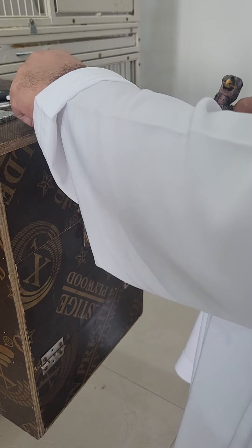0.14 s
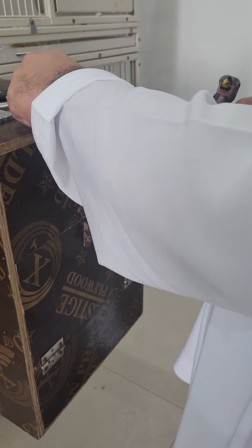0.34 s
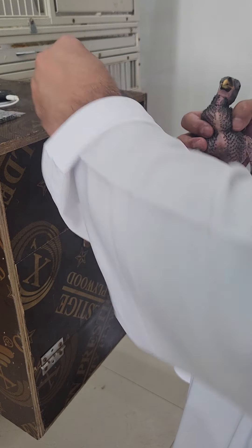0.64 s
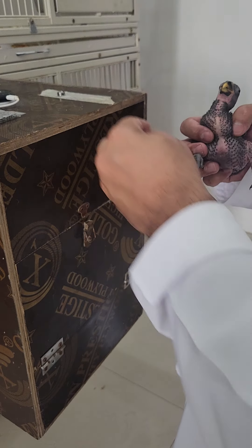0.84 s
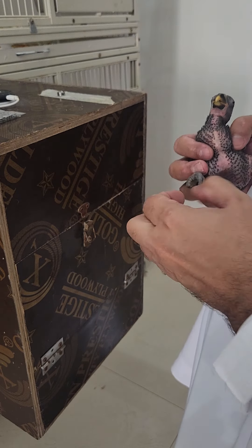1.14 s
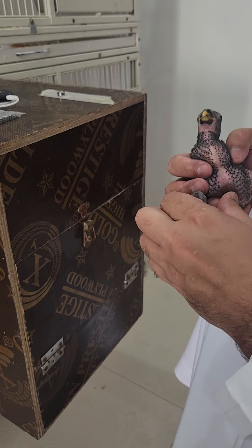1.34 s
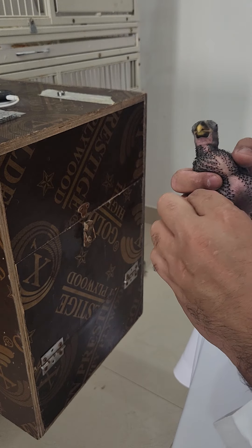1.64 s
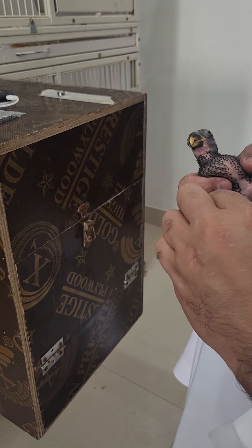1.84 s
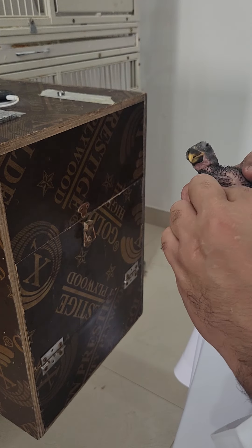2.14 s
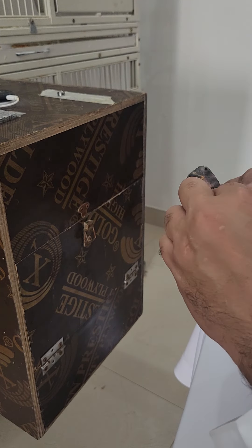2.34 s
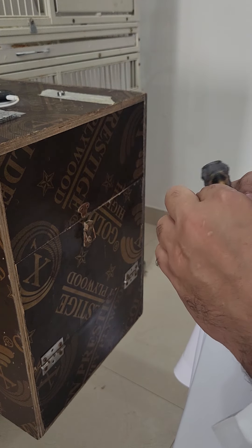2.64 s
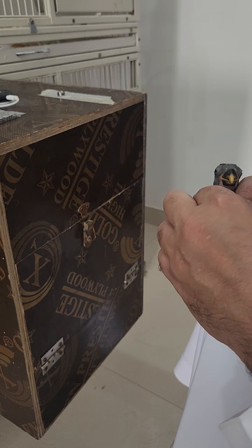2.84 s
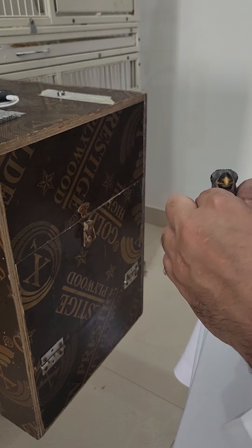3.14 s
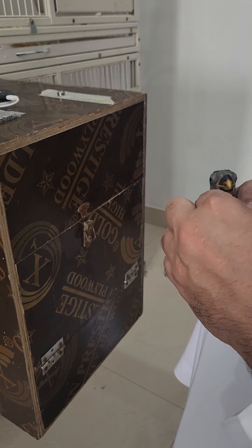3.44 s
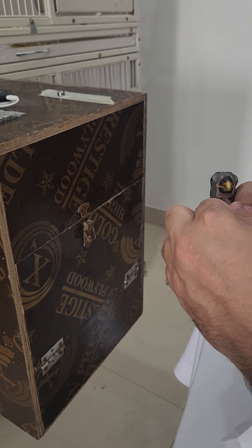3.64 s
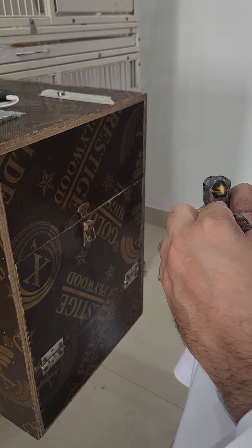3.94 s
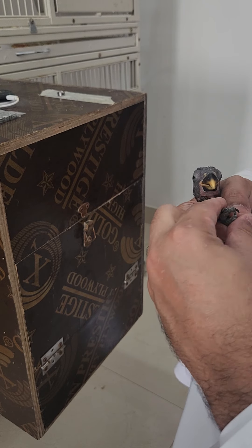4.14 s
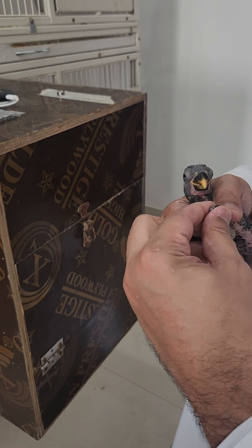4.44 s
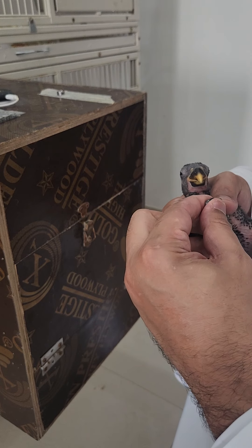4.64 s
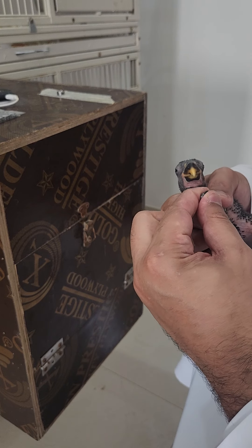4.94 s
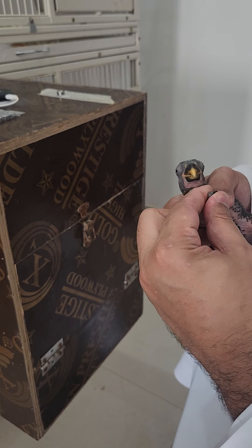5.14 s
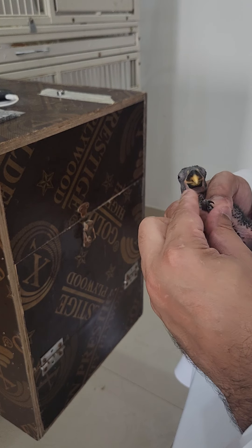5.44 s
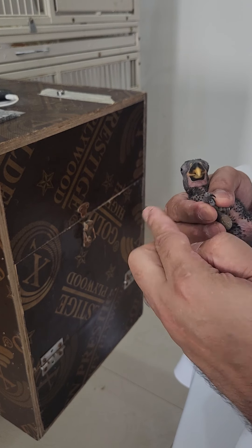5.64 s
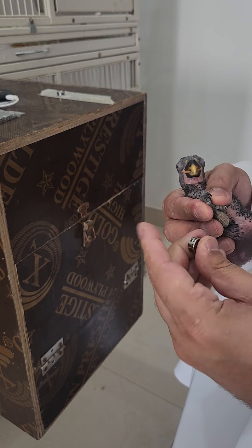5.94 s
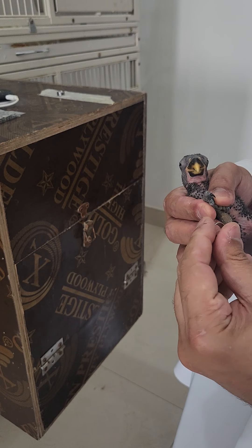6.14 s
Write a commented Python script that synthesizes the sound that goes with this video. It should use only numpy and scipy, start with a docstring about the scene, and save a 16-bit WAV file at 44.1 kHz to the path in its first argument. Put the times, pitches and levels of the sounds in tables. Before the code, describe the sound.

Ventilation air and a low motor hum fill a bare, echoing room, with the microphone a little way from a baby parrot. The bird opens with a few high, raspy screeches, each about half a second long. After a lull with soft handling rustle, a sharp squeak starts a rapid run of rough, whistling squeals that crack between pitches and collapse into rasps, ending in thin whines.

```python
"""In a bare tiled room a parrot chick, held in the hands, gives rasping screeches, then a run of squeals.
Source and filter: its syrinx either rattles chaotically or locks into whistles that jump between three
registers, and the resonances of throat and beak colour both. The hard walls reverberate after every
call, over ventilation noise, a low motor hum and the soft rustle of handling."""
import sys
import numpy as np
from scipy import signal
from scipy.fft import rfft, irfft, next_fast_len
from scipy.io import wavfile
from scipy.ndimage import uniform_filter1d, minimum_filter1d, map_coordinates

SR = 44100
rng = np.random.default_rng(int(sys.argv[2]) if len(sys.argv) > 2 else 0)


def transcribe(u):
    """Save the signal u as a 16-bit wav file named by the first command-line argument.

    u: samples, shape (n,) or (channels, n), limited to [-1, 1]; the rate is SR.
    q: integer samples, one column per channel.
    """
    v = np.clip(np.atleast_2d(u).T, -1, 1)
    q = np.round(v * 32767).astype(np.int16)
    wavfile.write(sys.argv[1], SR, q)


N = 277830
LEAD = SR * 3 // 10  # samples before t = 0, so the room is already ringing
TIME = np.arange(-LEAD, N) / SR


def undb(db):
    """Amplitude ratio of a level in decibels."""
    return 10 ** (np.asarray(db) / 20)


def unit(x):
    """Normalisation to rms 1."""
    return x / np.sqrt(np.mean(x ** 2))


def at_hz(points, hz):
    """Interpolation of (f/Hz, value) rows on a log-frequency axis."""
    f, value = np.transpose(points)
    return np.interp(np.log(np.maximum(hz, 1)), np.log(f), value)


def wander(t, rate):
    """Smooth random modulation of spread near 1, changing about rate times a second."""
    place = (t - t[0]) * rate
    return map_coordinates(rng.standard_normal(16384), [place], order=2, mode="wrap")


def course(t, start, length):
    """Zero-mean contours of a call: a ramp from -1/2 to 1/2 and an arch."""
    progress = np.clip((t - start) / length, 0, 1)
    return progress - 1 / 2, np.sin(np.pi * progress) - 2 / np.pi


def band(drive, hz, width, order=4):
    """Resonance by heterodyning: low-passed complex noise is shifted to a centre that may move."""
    envelope = signal.sosfilt(signal.butter(order, width / 2, fs=SR, output="sos"), drive)
    return np.real(envelope * np.exp(2j * np.pi * np.cumsum(hz + np.zeros(len(drive))) / SR))


def rasp(start, attack, hold, release, db, lower_hz, upper_hz, glide, upper_db, lift_db, trend_db,
         fifth_db, octave_db, hiss_db, opening_s=.025, lower_climb=0.0396, dulling=0.15):
    """Source and filter: chaotic air bursts from the syrinx ring formants that follow the beak."""
    # fixed resonances of throat and beak: f/Hz, bandwidth/Hz, relative level/dB
    throat = [(2080, 520, -24), (2700, 550, -21), (3380, 600, -18), (7400, 900, -16), (8250, 800, -19),
              (11500, 1300, -28), (12000, 7000, -31), (15300, 1400, -31)]
    corners = start + np.cumsum([0, attack, hold, release])
    sounding = (TIME >= corners[0]) & (TIME <= corners[-1])
    t = TIME[sounding]
    effort_db = np.interp(t, corners, [-10.5, 0, -3.5, -26.5])
    progress, gape = course(t, start, attack + hold + release / 2)
    shut = np.exp(-(t - start) / opening_s)  # the lower formant lies flat until the beak parts
    lower_hz = lower_hz * (1 + (glide + lower_climb) * progress + .06 * gape - .12 * shut)
    upper_hz = upper_hz * (1 + glide * progress + 0.01892 * gape)
    upper_db = upper_db + lift_db * gape + trend_db * progress
    bursts = undb(2.5 * wander(t, rate=520) + 2.25 * wander(t, rate=110))
    tremble = 1 + 0.01026 * wander(t, rate=140)

    def ring(modes, order):
        """Forced resonance: pulsed turbulence drives each mode; a weaker push is duller."""
        jets = rng.standard_normal((len(modes), 2, 2 * SR))[..., :len(t)] * bursts
        ringing = 0
        for (real, imag), (hz, width, gain_db) in zip(jets, modes):
            tilt_db = dulling * effort_db * np.maximum(np.log2(hz / lower_hz), 0)
            ringing += undb(gain_db + tilt_db) * band(real + 1j * imag, hz * tremble, width, order)
        return ringing

    lower_db = 10 * np.log10(2 / (1 + undb(upper_db) ** 2))  # the two formants share the power
    # same columns as throat
    formants = [(lower_hz, 417, lower_db), (upper_hz, 383, lower_db + upper_db)]
    overtones = [(1.5 * upper_hz, 550, fifth_db), (2 * upper_hz, 550, octave_db)]
    hiss = [(5700, 4400, hiss_db)]
    voice = ring(formants + overtones, order=2) + ring(throat + hiss, order=4)
    out = np.zeros(len(TIME))
    out[sounding] = unit(voice) * undb(db + effort_db)
    return out


def screeches():
    """Chaotic oscillation of the syrinx: long pushes screech, short ones grunt."""
    # t/s, attack/s, hold/s, release/s, level/dB, lower formant f/Hz, upper formant f/Hz, glide/fraction,
    # upper minus lower/dB, its lift by the open beak/dB, its trend from start to end/dB,
    # overtones a fifth and an octave above the upper/dB, hiss/dB
    rasps = [ (-.28, 0.17, 0.097, .08, -16.5, 3930, 5090, 0.013, 17, 9, -20, -35, -18, -19),
             (.52, 0.037, .36, 0.094, -16, 3715, 5255, 0.039, 3.5, 0, -9, -10.5, -17.5, -21),
             (1.387, .036, .427, 0.15, -16, 3737, 5252, -0.046, 1, 8, 3, -7, -23, -17),
             (2.072, .03, 0.23, 0.0629, -14, 3640, 5163, -.09, 11.5, 37, 15, -12.5, -22.5, -19.5),
             (3.89, 0.0091, 0.014, 0.076, -22.5, 3200, 5050, 0.037, 5, 3, -2, -27, -32, -13),
             (4.321, 0.0313, 0.51, 0.114, -25.5, 3686, 5276, -.06, -2.5, 18, -2, -10.5, -18, -11.5),
             (4.992, .055, 0.013, .15, -25, 3590, 5140, .005, 1, 7, -7, -20, -27, -8.5),
             (5.617, 0.024, 0.014, 0.21, -25.5, 3460, 5130, -0.00038, 0, 9, 9, -6, -31, -11.5)]
    return sum(rasp(*row) for row in rasps)


def ventilation(air_db=-38, wide_hz=650, split_hz=240, bass_db=0.9, left_db=1):
    """Broadband air noise, coherent between the channels in the bass, plus a wavering motor hum."""
    # spectral shape of the air noise: f/Hz, relative density/dB
    air_spectrum = [(20, -29), (45, -12), (75, -15), (120, -12.5), (200, -9), (400, -12.5), (600, -16),
                    (800, -13), (1100, -23.5), (1600, -22), (2500, -32), (5000, -39), (8000, -49.5),
                    (15000, -65)]
    # partials of the motor: f/Hz, level/dB ahead of the bass and recorder gains
    hum = [(49, -53.5), (98, -51.5), (147, -51.5), (198, -50), (488, -51)]
    # the recorder's gain on the background noise above the bass, drawn by hand,
    # down during calls and up in the lull: t/s, gain/dB
    recorder_gain = [(0, -5.5), (1.3, -5), (2.4, -5), (2.9, -2), (3.5, 0.5), (3.88, 1.5), (4.05, -4.5),
                     (6.3, -5)]
    size = next_fast_len(len(TIME))
    f = np.arange(size // 2 + 1) * SR / size
    mid, side = rfft(rng.standard_normal((2, size))) * undb(at_hz(air_spectrum, f))
    spread = np.minimum(f / wide_hz, 1) * np.array([[1], [-1]])
    air = irfft(mid + side * spread, size)[:, :len(TIME)]
    air = unit(air) * undb(air_db)
    for hz, db in hum:
        phase = 2 * np.pi * hz * TIME + 0.13 * wander(TIME, rate=4.8)
        air += np.sqrt(2) * undb(db + 2 * wander(TIME, rate=6)) * np.sin(phase)
    bass = signal.sosfiltfilt(signal.butter(2, split_hz, fs=SR, output="sos"), air)
    recorder_db = np.interp(TIME, *np.transpose(recorder_gain))
    air = undb(bass_db) * bass + (air - bass) * undb(recorder_db)
    return air * undb([[left_db], [-left_db]])


def room(x, direct_db=-7.5, early_db=0.5, tail_db=-1.25, left_db=1.82,
         build_up_s=0.0014, early_span_s=.02, right_lag_s=0.00025):
    """Convolution with direct sound, early reflections off a box and wall, and a diffuse tail."""
    # reverberation time: f/Hz, T60/s
    decay_times = [(1000, 2.09), (3000, 1.16), (5000, 1.104), (8000, 0.78), (11000, 0.59), (15000, 0.44)]
    t = np.arange(SR * 5 // 4) / SR
    f = np.arange(len(t) // 2 + 1) * SR / len(t)
    noise = rfft(rng.standard_normal((2, len(t))))
    centres = np.array(decay_times)[:, 0]
    tail = 0
    for share, (_, t60) in zip(np.eye(len(centres)), decay_times):
        band_noise = irfft(noise * np.interp(f, centres, share), len(t))
        tail += band_noise * np.exp(-np.log(1000) * t / t60)
    tail *= 1 - np.exp(-t / build_up_s)
    response = undb(tail_db) * unit(tail) / np.sqrt(len(t))
    # each reflection has its own direction, hence its own lag between the channels
    echo_s = rng.uniform(.1, 1, size=10) * early_span_s
    bearing = rng.uniform(-1, 1, size=10)
    for channel, lag in enumerate([0, right_lag_s]):
        response[channel, int(lag * SR)] += undb(direct_db)
        arrivals = ((echo_s + 2 * lag * bearing) * SR).astype(int)
        response[channel, arrivals] += undb(early_db) / np.sqrt(len(echo_s))
    heard = signal.fftconvolve(x[None], response, axes=1)[:, :len(TIME)]
    return heard * undb([[left_db], [-left_db]])


def swishes(rows, relative_width, grain_db):
    """Amplitude-modulated band noise: one short grainy swell a row."""
    out = np.zeros(len(TIME))
    for peak_s, half_length, hz, db in rows:
        near = np.abs(TIME - peak_s) < half_length
        t = TIME[near]
        real, imag = rng.standard_normal((2, SR))[:, :len(t)] * undb(grain_db * wander(t, rate=318))
        swell = np.cos(np.pi / 2 * (t - peak_s) / half_length) ** 2
        out[near] += unit(band(real + 1j * imag, hz, relative_width * hz)) * undb(db) * swell
    return out


def breath():
    """Turbulence: hoarse air escapes at the start of a push."""
    # puffs of air: peak t/s, half-length/s, centre f/Hz, level/dB
    puffs = [(.535, 0.021, 2480, -26.5), (1.425, 0.059, 2030, -33.5), (1.44, 0.055, 2943, -25),
             (3.91, 0.027, 1900, -25), (3.91, 0.023, 3100, -20.5), (3.96, 0.06, 2110, -44),
             (4.3, 0.091, 2032, -36.5), (4.53, 0.11, 1495, -39.5), (4.71, 0.089, 1206, -39),
             (5.07, 0.11, 1797, -37.5), (5.655, 0.07, 1850, -35.5)]
    return swishes(puffs, relative_width=0.46, grain_db=-2)


def whistle(start, length, hz, rise, arch, db, swell_db, overtone_db, rough,
            edge_s=0.0025, scoop_s=.018):
    """Self-sustained oscillation: the syrinx locks on one register; roughness shakes pitch and level."""
    # transmission of throat and open beak: f/Hz, gain/dB
    beak = [(2500, -5), (3000, -11.5), (3700, -5.5), (4400, -18), (5100, 8.5), (6100, -25.5), (7400, -11.5),
            (7900, -15.5), (9100, -33.5), (10200, -15.5), (11200, -32), (13000, -44.5), (15300, -37.5)]
    end = start + length
    sounding = (TIME >= start) & (TIME <= end + edge_s)
    t = TIME[sounding]
    progress, bow = course(t, start, length)
    slack = np.exp(-(t - start) / scoop_s)  # flat and dull while pressure builds
    hz = hz * (1 + rise * progress + arch * bow - .012 * slack)
    drift = 0.00435 * wander(t, rate=59.9)
    jitter = rough * (0.01945 * wander(t, rate=225.5) + 0.026 * wander(t, rate=1099))
    phase = 2 * np.pi * np.cumsum(hz * (1 + drift + jitter)) / SR
    tone = undb(at_hz(beak, hz)) * np.sin(phase)
    overtone_db = overtone_db - 3 * slack + 1.5 * wander(t, rate=123.4)
    for k in range(2, 7):
        tone += (k * hz < SR / 2) * undb(at_hz(beak, k * hz) + overtone_db) * np.sin(k * phase)
    shimmer_db = 5 * rough * wander(t, rate=385.4)
    sputter_db = 2 * wander(t, rate=90)
    tone *= undb(shimmer_db + sputter_db)
    gate = np.clip(np.minimum(t - start, end + edge_s - t) / edge_s, 0, 1)
    out = np.zeros(len(TIME))
    out[sounding] = unit(tone) * undb(db + swell_db * progress) * np.sin(np.pi / 2 * gate) ** 2
    return out


def squeaks_and_whine():
    """Periodic oscillation: two squeaks open a screech; a 3 kHz whine comes and goes around the squeals."""
    # the rows at 5.06, 5.124 and 5.382 s are brief loud flares of the whine as it rings in the room
    # tones: t/s, length/s, f/Hz, rise/fraction, arch/fraction, level/dB, swell/dB,
    # overtones ahead of the beak/dB, roughness (0-1)
    tones = [ (.551, 0.0074, 2595, 0.0035, .002, -17.5, -16, -20, 0.5),
             (.559, 0.035, 3654, -0.02, 0.025, -15, -8, -8, 0.38),
             (3.919, .046, 2917, -0.048, -0.021, -11, 0.5, -10, 0.07),
             (4.253, 0.18, 2830, 0.097, 0.014, -16.5, 13.5, -8.5, 0.49),
             (4.449, 0.11, 2985, 0.032, -0.0046, -21, -10, -2, 0.22),
             (4.599, 0.26, 2992, .005, -0.0094, -24.5, 4.5, -19, 0.55),
             (4.959, .085, 3085, .04, 0.01, -20, 6, -4.5, 0.29),
             (5.06, .024, 3045, -.02, .002, -10, 1, -6, .14),
             (5.124, 0.028, 3000, -0.0093, 0.018, -16.5, -5, -3, 0.11),
             (5.276, 0.1086, 3085, .025, 0.012, -18.5, -4, -7, .2),
             (5.382, 0.021, 3083, -0.043, 0.0038, -9.5, -4, -8, .12),
             (5.624, 0.059, 3039, -0.00045, 0.0034, -12, -1.5, -7, 0.25),
             (5.681, 0.0913, 3060, .02, 0.0033, -15.5, -3, 1.5, 0.45),
             (5.986, 0.092, 3119, 0.018, 0.002, -16.5, 0, -9.5, 0.34),
             (6.074, .095, 3015, -0.038, 0.0018, -15.5, -6.5, -6, 0.16),
             (6.186, .117, 2990, 0.0041, -0.0045, -27.5, 1, -8, 0.32)]
    return sum(whistle(*row) for row in tones)


def handling():
    """Friction noise: hands and sleeve rustle."""
    # rustles: peak t/s, half-length/s, centre f/Hz, level/dB
    rustles = [(2.77, 0.062, 2312, -41.5), (2.84, 0.16, 1183, -45.5), (3.29, 0.09, 10100, -69),
               (3.4, 0.022, 10000, -59), (3.62, 0.016, 4850, -56), (3.76, 0.037, 7100, -59),
               (3.86, 0.037, 3270, -44)]
    return swishes(rustles, relative_width=0.65, grain_db=7.5)


def squeals():
    """Bifurcation: the voice breaks into the low register, the high one joins, both collapse to a rasp."""
    # squeals: break t/s, time stretch/ratio, low f/Hz, high f/Hz, low, high and rasp level/dB
    calls = [ (3.97, .87, 2502, 3754, -16, -20.5, -16), (4.527, 0.93, 2544, 3722, -20, -23.5, -20.5),
             (5.111, 1.02, 2569, 3727, -18, -24.5, -22.5), (5.715, 1.01, 2589, 3705, -18.5, -23.5, -22)]
    # the low register enters clean, then turns rough and passes its power to the octave: delay/s,
    # length/s, rise/fraction, relative level/dB, swell/dB, overtones at the syrinx/dB, roughness (0-1)
    low_course = [(0, 0.065, 0.0099, -3.5, -1.5, -8.5, 0.11), (.064, 0.127, -0.0285, 0, 1, 34, .58),
                  (.186, .11, .012, -4.5, -1, 17, .42)]
    # the high register flicks in as the low one turns rough, then returns to stay: same columns
    high_course = [(.054, 0.019, 0.022, -2, -3, 4.9, .45), (.18, 0.1633, 0.0153, 0.45, -4, 2.6, 0.3)]
    # a hoarse leak, then the closing rasp: delay/s, attack/s, hold/s, release/s, relative level/dB
    rasp_course = [(0.023, .08, 0.21, 0.0494, -15), (0.286, 0.053, .018, .11, 0)]
    # throat in a squeal: lower and upper formant f/Hz, glide/fraction, upper minus lower/dB, lift/dB,
    # trend/dB, two overtones/dB, hiss/dB
    throat = (3660.5, 5300, 0.61, 3, -7, 20, -13, -21, -11.5)
    out = np.zeros(len(TIME))
    for start, stretch, low_hz, high_hz, low_db, high_db, rasp_db in calls:
        for stages, hz, db in [(low_course, low_hz, low_db), (high_course, high_hz, high_db)]:
            for delay, length, rise, stage_db, swell_db, overtone_db, rough in stages:
                out += whistle(start + stretch * delay, stretch * length, hz, rise, 0,
                               db + stage_db, swell_db, overtone_db, rough)
        for delay, attack, hold, release, stage_db in rasp_course:
            out += rasp(start + stretch * delay, attack, hold, release, rasp_db + stage_db, *throat)
    return out


def scene():
    """Superposition: chick and hands reverberate in the room, over the ventilation."""
    chick = screeches() + squeaks_and_whine() + squeals() + breath()
    return (room(chick + handling()) + ventilation())[:, LEAD:]


def record(dry, top_hz=15800):
    """Peak limiting holds the level to full scale; a steep low-pass cuts the highest treble."""
    allowed = 1 / np.maximum(np.abs(dry).max(axis=0), 1)
    gain = uniform_filter1d(minimum_filter1d(allowed, size=221), size=221)  # 5 ms windows
    return signal.sosfilt(signal.ellip(10, .2, 80, top_hz, fs=SR, output="sos"), dry * gain)


dry = scene()
out = record(dry)
transcribe(out)
```